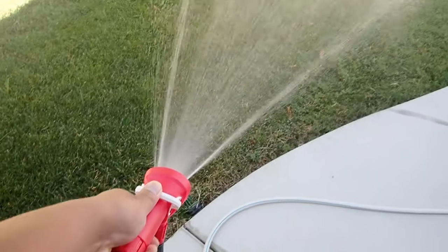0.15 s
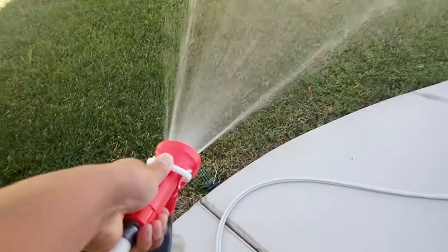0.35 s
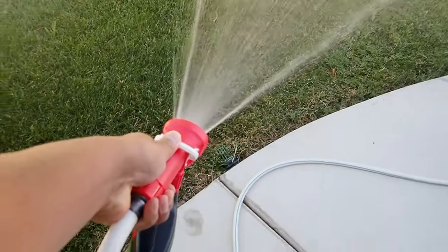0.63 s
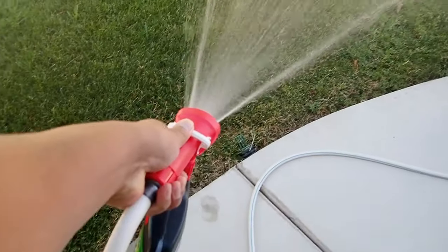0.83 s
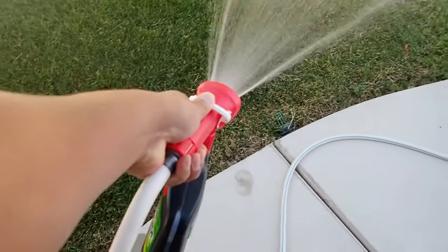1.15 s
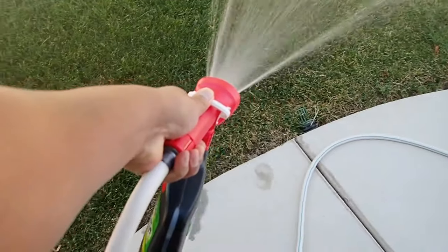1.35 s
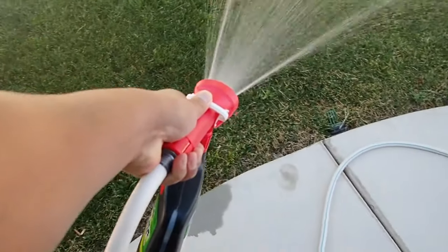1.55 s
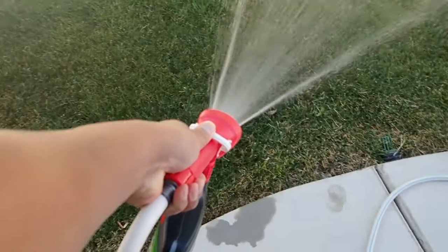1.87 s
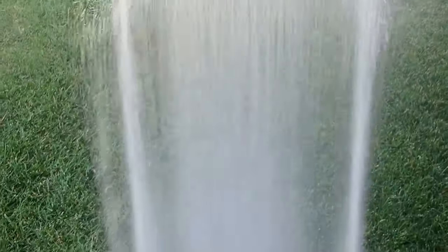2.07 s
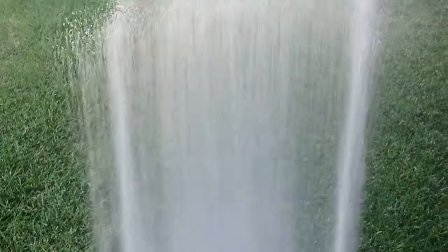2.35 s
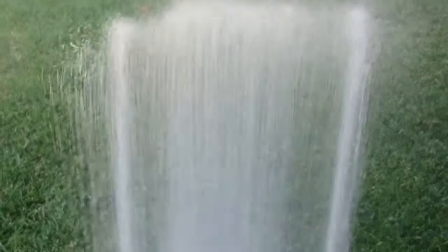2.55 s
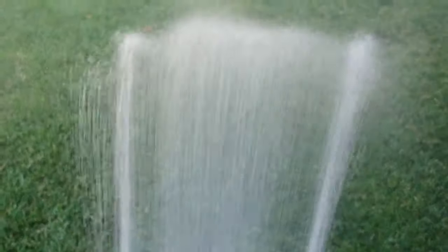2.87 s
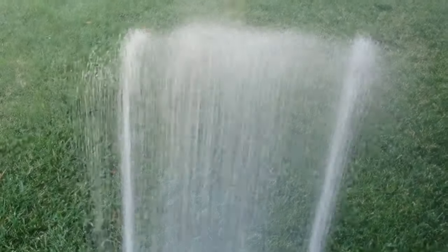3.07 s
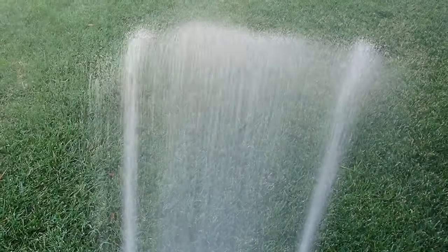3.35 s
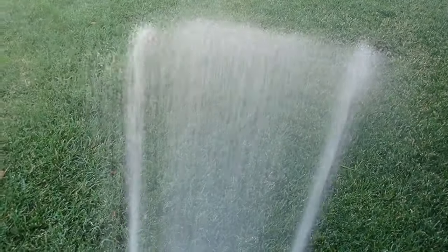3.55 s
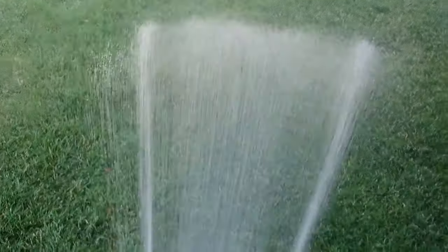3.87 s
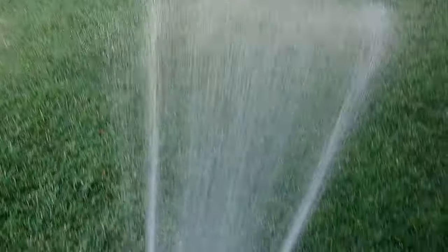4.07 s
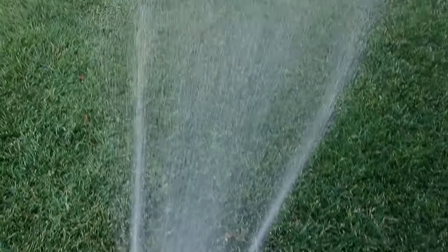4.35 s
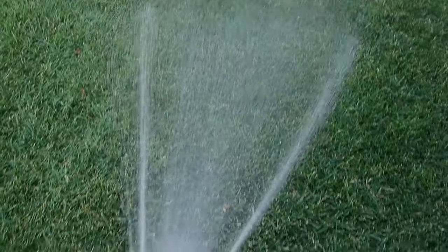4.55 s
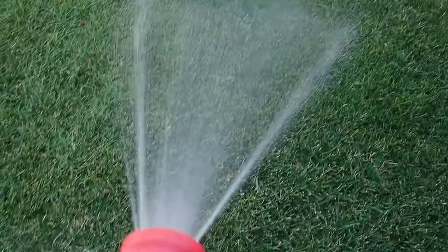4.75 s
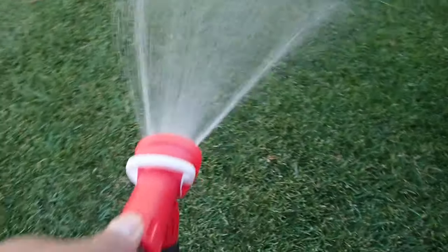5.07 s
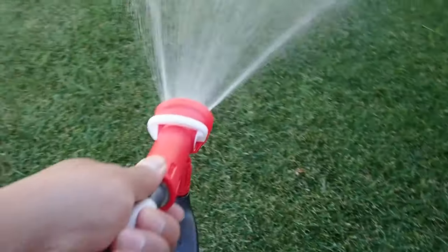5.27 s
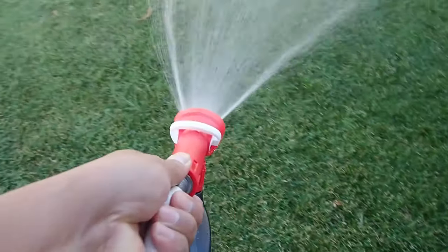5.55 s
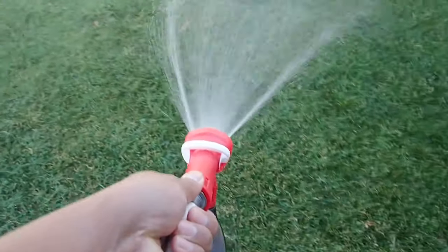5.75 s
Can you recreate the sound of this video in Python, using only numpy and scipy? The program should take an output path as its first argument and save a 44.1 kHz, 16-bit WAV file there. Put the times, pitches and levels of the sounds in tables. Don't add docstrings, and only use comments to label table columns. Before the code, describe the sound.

Open-air garden, microphone close to a hand-held hose nozzle. From 0 to 2 s a steady, bright, finely grained hiss of water dominates, slightly hollow from short reflections off arm and ground, with light patter on grass underneath and a very faint low fan hum. Small sharp drips tock and snap on paving: a quick cluster in the first 0.35 s, a few near 0.6 to 0.7, then scattered ones at 1.1, 1.2, 1.4, 1.6 and a tight group around 1.9. At 1.99 s everything cuts to dead silence until 2.11 s. The spray then returns, recovering over roughly a tenth of a second, with landing patter far stronger, dense and soft. Faint dull microphone bumps come at 2.4, 2.5, 2.7 and 3.3 s. Patter gradually sinks; a lone drip ticks at 4.1 s. Toward 4.6 to 5 s the nozzle hiss brightens, continuing unbroken to the end, about 5.9 s.

```python
import sys
import numpy as np
from scipy import signal
from scipy.fft import rfft, irfft, next_fast_len
from scipy.io import wavfile
from scipy.ndimage import map_coordinates

SR = 44100
rng = np.random.default_rng(int(sys.argv[2]) if len(sys.argv) > 2 else 0)


def level_to_linear(level):
    exponent = np.asarray(level, float) / 20
    return 10 ** exponent


def bounce(signal):
    frames = np.transpose(np.atleast_2d(signal))
    limited = np.clip(frames, -1, 1)
    pcm = np.round(limited * 32767).astype(np.int16)
    wavfile.write(sys.argv[1], SR, pcm)


N = 261072
SIZE = next_fast_len(N)
BINS_HZ = np.arange(SIZE // 2 + 1) * SR / SIZE + 1e-3


def in_time(rows):
    s, *columns = np.transpose(rows)
    return np.array([np.interp(np.arange(N) / SR, s, column) for column in columns])


def at_hz(points, hz):
    table_hz, values = np.transpose(points)
    return np.interp(np.log(hz), np.log(table_hz), values)


def drift(rate_hz):
    r = np.exp(-80 * np.pi * rate_hz / SR)
    slow = signal.lfilter([1], [1, -2 * r, r * r], rng.standard_normal(N // 40 + 2002))[2000:]
    return np.interp(np.arange(N) / 40, np.arange(len(slow)), slow / slow.std())


def ring(clicks, hz, t60):
    r, w = level_to_linear(-60 / (t60 * SR)), 2 * np.pi * hz / SR
    return signal.lfilter([0, np.sin(w)], [1, -2 * r * np.cos(w), r * r], clicks + 1e-18)


# (start t/s, end t/s)
SILENCE = (1.9878, 2.1072)


def first_stretch():
    return np.arange(N) < SILENCE[0] * SR


# (t/s, nearness to landing spray level/dB, aim from -1 along the nozzle axis to 1 across the fan,
# nearness to nozzle level/dB)
LISTENER = [(0.0, -3.5, -0.61, 0.5), (0.35, -5, -0.13, 1), (1.0, -4, -0.41, .5), (1.75, -4, 0.012, -1.1),
            (1.98, -2.5, .3, -0.5), (2.11, 8.5, 0.29, 0), (2.45, 9, 0.26, 3), (2.7, 8, -0.52, 0.5),
            (2.95, 5.5, -.7, 0), (3.35, 5, -.2, -1.3), (3.7, 3.5, .2, -1.5), (4.2, 0.9, 0.87, -0.3),
            (4.6, -1.3, 1.2, 1.5), (4.9, -2.7, 1.4, 2.5), (5.15, -2.5, -0.82, 1.6), (5.4, -3, -1.33, 1.5),
            (5.92, -6, -0.94, 1)]


def heard(answers):
    return np.array(answers) @ np.array([*in_time(LISTENER), first_stretch()])


# (f/Hz, pitch wander spread f/Hz, level/dB)
HUM = (236, 1.6, -60)


def hum():
    hz, wander_hz, level_db = HUM
    phase = 2 * np.pi * np.cumsum(hz + wander_hz * drift(6.9)) / SR
    tone = level_to_linear(1.5 * drift(6.2)) * np.sin(phase)
    tone = tone + level_to_linear(-9 + 3 * drift(1.5)) * np.sin(4 * phase)
    return level_to_linear(level_db + 4.5) * tone * first_stretch()


# (t/s, peak level/dB)
BUMPS = [
    (2.395, -44),
    (2.53, -48),
    (2.72, -49),
    (3.29, -47),
]


def bumps():
    clicks = np.zeros(N)
    for s, peak_db in BUMPS:
        clicks[round(s * SR)] = level_to_linear(peak_db + 5.0)
    push = ring(ring(clicks, 130, 0.025), 75, 0.019) / 25
    return signal.sosfilt(signal.butter(2, 40, "high", fs=SR, output="sos"), push)


# (t/s, peak level/dB, pitch f/Hz, snap level/dB, brightness level/dB)
DRIPS = [(0.0965, -20, 1930, -4.5, -1.5), (0.1043, -24, 2050, -1, -3), (0.1166, -21.5, 2000, -2, -1.5),
         (0.1665, -31, 1830, -3, -3), (0.1966, -27.5, 2180, 1, -3), (0.2697, -25, 1590, -5, -1),
         (0.318, -19.5, 1940, -2, -0.5), (0.5761, -19.5, 2030, -4, 0), (0.6977, -31.5, 2150, -8, -1.5),
         (0.7124, -20.5, 2070, -4.5, -2), (1.0805, -25, 2150, -0.5, -1.5), (1.1821, -23.5, 2150, -2.5, -3),
         (1.4096, -28, 2180, 0, -2), (1.5623, -25.5, 2280, -4, -7), (1.8962, -27, 2140, -5.5, -1),
         (1.9019, -22, 2206, -5, -1.5), (1.9322, -21, 2180, -3, -2), (4.1215, -23.5, 1940, -4, -3)]
# (f/Hz, decay t60 t/s)
SNAP = [(5100, 0.0047), (6700, 0.0058), (9400, 0.0033)]


def drips():
    out = np.zeros(N)
    click = np.zeros(900)
    click[24] = 1
    for s, peak_db, hz, snap_db, bright_db in DRIPS:
        tock = ring(ring(click, hz, 0.0053), 0.99 * hz, 0.0033)
        tock = tock + 0.5 * ring(ring(click, 0.84 * hz, 0.005), 0.82 * hz, 0.0027)
        snap = 0
        for k, (snap_hz, t60) in enumerate(SNAP):
            snap = snap + level_to_linear(k * bright_db) * ring(ring(click, snap_hz, t60), snap_hz, 0.0011)
        at = round(s * SR)
        out[at:at + 900] += level_to_linear(peak_db) * (tock / tock.max() - level_to_linear(snap_db - 1.5) * snap)
    return signal.sosfilt(signal.butter(2, 1100, "high", fs=SR, output="sos"), out)


def droplets(per_s, spread_db):
    sizes = level_to_linear(spread_db * np.minimum(rng.exponential(1, N), 4)) * rng.standard_normal(N)
    hits = sizes * (rng.random(N) < per_s / SR)
    return hits / hits.std()


# (f/Hz, share alike 0 to 1)
LIKENESS = [(40, .2), (80, .45), (160, .84), (300, .972), (600, .99), (1200, .999), (2600, .997),
            (3500, .96), (4300, .95), (5400, .98), (6300, .94), (7200, .985), (8300, .88), (10500, .92),
            (13000, .94)]
# (f/Hz, level/dB)
TILT = [(60, -0.5), (300, -0.7), (2000, 0), (3500, 0), (4500, 4.5), (5400, 1), (6300, 4), (7200, 0.5),
        (8500, 5), (10500, 3.5), (13000, 1.5), (15500, 6)]
# (f/Hz, phase/rad)
LEAD = [(0, 0), (3790, -0.0), (4390, 0.95), (5430, -0.71), (6290, 0.26), (7060, -0.0), (8180, 0.41),
        (9820, -0.63), (14400, -0.22), (15400, -0.1)]


def at_ports(per_s, spread_db):
    mid = rfft(droplets(per_s, spread_db), SIZE)
    side = rfft(droplets(per_s, spread_db), SIZE)
    alike = np.clip(at_hz(LIKENESS, BINS_HZ), 0, 1)
    turn = level_to_linear(at_hz(TILT, BINS_HZ) / 2) * np.exp(0.5j * at_hz(LEAD, BINS_HZ))
    both = np.sqrt((1 + alike) / 2) * mid + np.sqrt((1 - alike) / 2) * side * [[1], [-1]]
    return both * np.array([turn, 1 / turn])


def spray(stream, spectrum, centres_hz, levels_db, patchy_db, surge_db, count=12):
    low_hz, high_hz = spectrum[0][0], spectrum[-1][0]
    colour = level_to_linear(at_hz(spectrum, BINS_HZ)) * (BINS_HZ > low_hz) * (BINS_HZ < high_hz)
    nodes = np.geomspace(low_hz, high_hz, count)
    change = levels_db - levels_db[:, N // 2:].mean(axis=1, keepdims=True)
    surge = surge_db * (drift(3.0) + 0.7 * drift(40))
    out = 0
    for node, hat in zip(nodes, np.eye(count)):
        share = np.interp(np.log(BINS_HZ), np.log(nodes), hat)
        weights = [np.interp(np.log(node), np.log(centres_hz), e) for e in np.eye(len(centres_hz))]
        gain_db = weights @ change + surge + patchy_db * drift(20)
        out = out + level_to_linear(gain_db) * irfft(stream * colour * share, SIZE)[:, :N]
    return out / np.sqrt(np.mean(colour ** 2))


# (f/Hz, level per Hz/dB)
GRASS = [(18, -56), (30, -29), (108, -12.5), (194, -10.5), (277, -6), (337, -6), (562, -3), (671, -9.5),
         (801, -1.5), (1080, -1), (1530, -1), (1870, -3), (2230, -1.5), (2660, -14), (3300, -36),
         (4290, -59), (7260, -120)]
LANDING_HZ = [60, 260, 1100, 2250]
# (share of spray nearness, level per unit of aim/dB,
# share of nozzle nearness, level added in the first stretch/dB)
PATTER_ANSWERS = [
    (0.72, 0.3, .05, 1.2),
    (1, 0, .05, 3.5),
    (0.97, 1.3, .05, -1),
    (0.68, .1, .05, 0.5),
]


def landing_spray():
    stream = at_ports(6000, spread_db=0.4)
    levels_db = heard(PATTER_ANSWERS)
    return level_to_linear(-40.0) * spray(stream, GRASS, LANDING_HZ, levels_db, patchy_db=0.0, surge_db=-0.16)


# (t/s, delay off the arm t/ms, delay off the ground t/ms)
ECHOES = [
    (0.0, 1.62, 4.97),
    (0.2, 1.52, 4.92),
    (0.8, 1.476, 4.8),
    (1.99, 1.46, 4.58),
]
ECHO_DB = [-17, -11.5]


def echoes(jet):
    out, end = np.zeros_like(jet), round(SILENCE[0] * SR)
    for delay_ms, db in zip(in_time(ECHOES), ECHO_DB):
        read = (np.arange(N) - delay_ms * SR / 1000)[:end]
        late = [map_coordinates(side[:end], [read], order=3, mode="mirror") for side in jet]
        out[:, :end] += level_to_linear(db) * np.array(late)
    return out


SIDE_ANSWERS = [(-0.1, .1, .05, .4)]


def swing(jet):
    pan_db, = heard(SIDE_ANSWERS)
    swing_db = pan_db - pan_db[N // 2:].mean()
    return jet * level_to_linear(np.array([swing_db, -swing_db]) / 2)


# (f/Hz, half width f/Hz)
MOUTH_MODES = [
    (5030, 390),
    (6700, 390),
    (8200, 670),
]
MOUTH_DB = [-36, -32, -31]
MOUTH_ANSWERS = [
    (1.59, 0, -0.065, 2.5),
    (0.46, 1.5, -.5, -1.8),
    (0.26, -5.5, .4, -7),
]


def nozzle_mouth():
    stream = at_ports(25000, spread_db=1.6)
    out = 0
    for (hz, half_hz), level_db in zip(MOUTH_MODES, np.c_[MOUTH_DB] + heard(MOUTH_ANSWERS)):
        bell = np.exp(-0.5 * ((BINS_HZ - hz) / half_hz) ** 2)
        band = irfft(stream * bell, SIZE)[:, :N] / np.sqrt(np.mean(bell ** 2))
        out = out + level_to_linear(level_db + 0.4 * drift(7)) * band
    return level_to_linear(-3.5) * out


# (f/Hz, level per Hz/dB)
HISS = [(2700, -21), (3100, -24), (4000, -14.5), (4700, -7.5), (5700, -2), (6700, -2.5), (7500, -3),
        (8700, -1.5), (9400, -3), (10200, -14.5), (10800, -12), (11500, -13), (12700, -2.5), (14000, -6.5),
        (15800, -24)]
JET_HZ = [3800, 5850, 9300, 13000]
JET_ANSWERS = [
    (0.79, 0.77, 0.2, -0.5),
    (0.42, 2.55, .3, 1.5),
    (.2, .1, 0.99, -0.5),
    (0.63, .3, .2, 0.5),
]


def jet_hiss():
    stream = at_ports(25000, spread_db=1.6)
    return level_to_linear(-27) * spray(stream, HISS, JET_HZ, heard(JET_ANSWERS), patchy_db=0.5, surge_db=0.4)


def scene():
    near = hum() + bumps() * np.array([[1.3], [0.4]]) + drips() * level_to_linear(np.array([[0.4], [-0.4]]))
    patter = landing_spray()
    nozzle = jet_hiss() + nozzle_mouth()
    return swing(nozzle + echoes(nozzle)) + patter + near


def low_pass(x):
    return signal.sosfilt(signal.butter(12, 15830, fs=SR, output="sos"), x)


def record(dry):
    t = np.arange(N) / SR
    start_s, end_s = SILENCE
    recover_db, recover_s, offset = -9.5, 0.07, -0.0008
    gain = level_to_linear(recover_db * np.exp(-np.abs(t - end_s) / recover_s) * (t > start_s))
    mix = (gain * dry + offset) * ((t < start_s) | (t > end_s))
    return low_pass(mix)


dry = scene()
out = record(dry)
bounce(out)
```